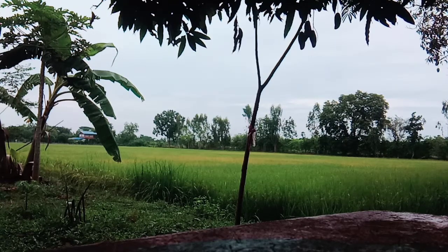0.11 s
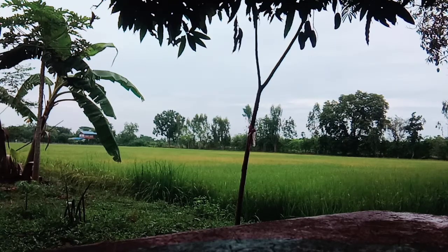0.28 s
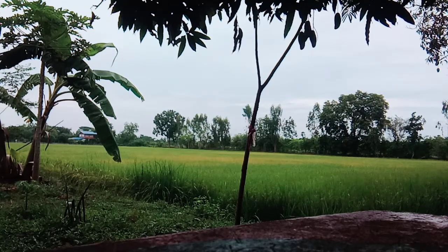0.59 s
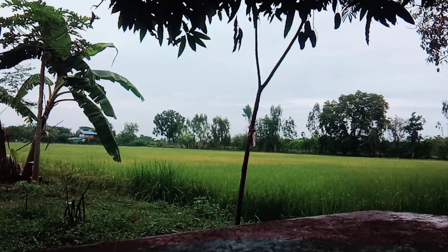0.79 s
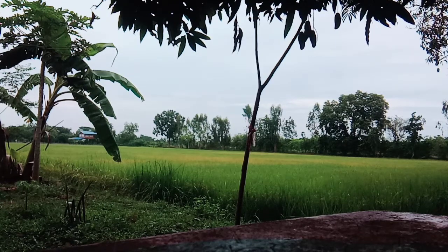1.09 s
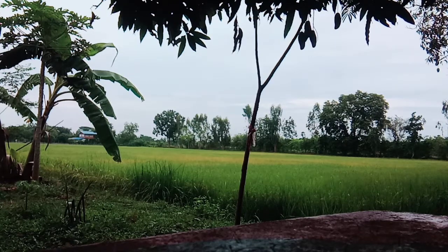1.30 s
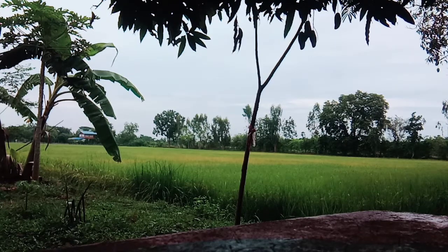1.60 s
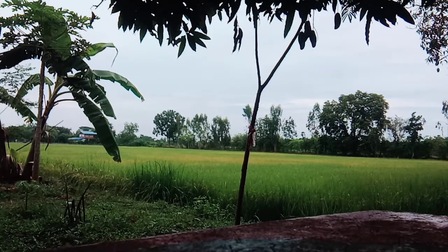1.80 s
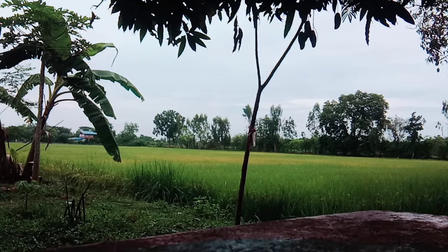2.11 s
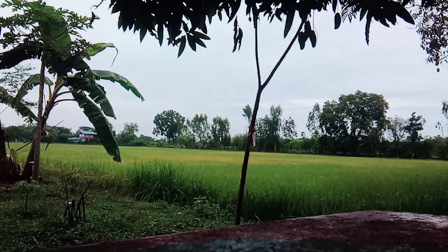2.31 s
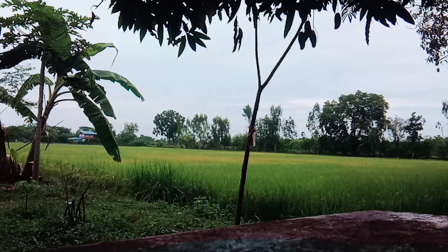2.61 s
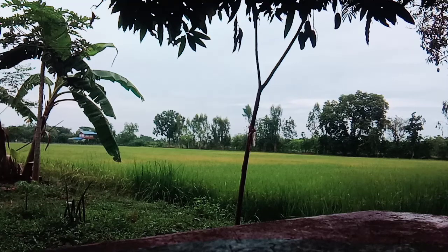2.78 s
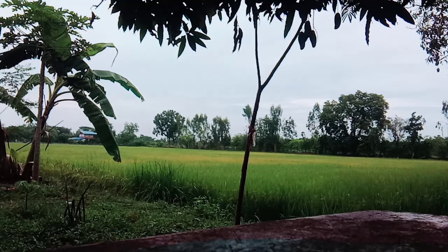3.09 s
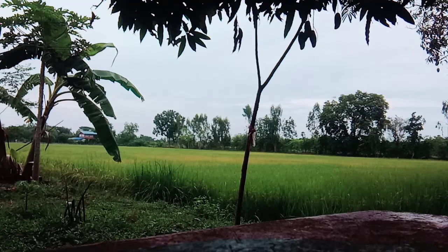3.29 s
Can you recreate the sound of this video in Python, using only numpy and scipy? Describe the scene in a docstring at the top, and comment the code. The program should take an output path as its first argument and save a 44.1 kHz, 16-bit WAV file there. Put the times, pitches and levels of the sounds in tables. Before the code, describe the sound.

A bird's sharp buzzy chirp repeats over a rice field while a distant rooster crows once midway

```python
"""Morning at the edge of a rice field: hazy air, noise-band insects and a humming far motor run throughout.
From the start a far bird pipes arched tones and songbirds whistle thin glides; a near bird soon joins,
repeating a buzzy chirp, a wavering tone plus noise, in three steps of lower and lower pitch. Then fowl cluck
in short rising tones, and two soft knocks ring in low modes, one before and one during a rooster's single
crow of stacked harmonics. Very distant calls overlap behind it all, and foliage scatters every call."""
import sys
import numpy as np
from scipy import signal
from scipy.fft import rfft, irfft
from scipy.io import wavfile

SR = 44100
rng = np.random.default_rng(int(sys.argv[2]) if len(sys.argv) > 2 else 0)


def generate_wav(sig):
    """Save sig (samples, or channels by samples) to the path in sys.argv[1] as 16-bit PCM at SR."""
    pcm = np.round(np.clip(np.atleast_2d(sig).T, -1, 1) * 32767).astype(np.int16)
    wavfile.write(sys.argv[1], SR, pcm)


N = 152145  # samples, about 3.45 s


def undb(db):
    """Turn decibels into gain."""
    return 10 ** (np.asarray(db) / 20)


def unit(x):
    """Scale a sound to rms 1."""
    return x / np.sqrt(np.mean(x ** 2) + 1e-20)


def band(hz, width):
    """Noise in one bell-shaped band of frequencies, rms 1."""
    f = np.arange(N // 2 + 1) * SR / N
    bell = np.exp(-2 * ((f - hz) / width) ** 2)
    return unit(irfft(rfft(rng.standard_normal(N)) * bell, N))


def wobble(rate):
    """Smooth random wander with spread 1; a higher rate in Hz wanders faster."""
    return band(0, 2 * rate)


def tone(hz):
    """Sine of rms 1 that follows a pitch curve."""
    return np.sqrt(2) * np.sin(2 * np.pi * np.cumsum(hz) / SR)


def note(start, length):
    """Progress 0-1 through a note, and its rounded envelope."""
    u = np.clip((np.arange(N) / SR - start) / length, 0, 1)
    arch = np.abs(np.sin(np.pi * u))
    return u, np.sqrt(arch) * np.minimum(4 * arch, 1)


def course(points):
    """Join (time_s, value) points by straight lines."""
    return np.interp(np.arange(N) / SR, *np.array(points).T)


def rasp(start, length, from_hz, to_hz, width_hz):
    """A rough note: a band of noise moved up to a gliding pitch."""
    u, gate = note(start, length)
    return gate * tone(from_hz + (to_hz - from_hz) * u) * band(0, width_hz)


def scatter(x, early_db, early_t60, late_db, late_t60):
    """Direct sound, quick echoes from leaves and trunks, and a faint tail from the tree line."""
    t = np.arange(N) / SR
    echoes = rng.standard_normal(N) * (rng.random(N) < .05)  # sparse random echoes
    response = np.zeros(N)
    for db, t60 in ((early_db, early_t60), (late_db, late_t60)):
        fade = np.exp(-np.log(1000) * t / t60)  # falls 60 dB in t60 seconds
        tail = echoes * fade * np.minimum(t * 20 / t60, 1)
        response += undb(db) * tail / np.linalg.norm(tail)
        echoes = echoes[::-1]
    response[0] = 1  # direct sound
    return signal.fftconvolve(x, response / np.linalg.norm(response))[:N]


# near bird, three steps to a chirp: start_s, length_s, base_pitch_hz, base_level_db,
# buzz (0-1), opening_level_db (added to the start of the step)
CHIRP_STEPS = [(.314, 0.036, 4960, -35.5, 0.78, -2), (.353, 0.0294, 4554, -25.5, 0.5, -16),
               (.388, 0.033, 3480, -36, 1, -6.5), (1.369, 0.028, 4750, -36.5, 0.76, -2.5),
               (1.402, 0.031, 4463, -29, 0.7, -7), (1.43, 0.042, 3463, -35, 0.94, -4),
               (2.095, .034, 5096, -32, 0.96, -5.5), (2.131, 0.039, 4637, -33.5, 0.77, 1.5),
               (2.168, 0.045, 3565, -37.5, 0.78, -6.5), (3.014, 0.0334, 4955, -34, 0.72, -4),
               (3.046, 0.03, 4320, -30, 0.85, -5), (3.082, 0.038, 3603, -33.5, 0.64, -8)]
# pitch and loudness along every step: share of its length (0-1), pitch_ratio, added_level_db
STEP_COURSE = [(0, .96, -1), (.2, .91, -5), (.36, 0.94, -4), (.7, 1.01, -3), (1, .96, -4.5)]
# thin, broken slur leading into each chirp: start_s, length_s, from_hz, to_hz, level_db
LEAD_SLURS = [(0.293, 0.027, 7370, 6320, -58), (0.31, 0.016, 6000, 5520, -50),
              (1.327, 0.044, 7500, 7350, -64.5), (1.355, 0.023, 5480, 5350, -52.5),
              (2.067, 0.025, 7300, 6400, -60.5), (2.082, 0.015, 5700, 5316, -50),
              (2.992, 0.028, 5650, 5370, -53.5)]
BUZZ_HZ, BUZZ_DEPTH, CHIRP_JITTER = 245.1, 0.041, 0.035  # depth and jitter are shares of the pitch
CHIRP_OVERTONE_DB = -48.5
RASP_WIDTH_HZ, RASP_DB = 1120, -6  # noise that spreads each step; level against the whistle at full buzz
OPENING_SHARE, OPENING_FADE_SHARE = 0.24, 0.42  # shares of the step; the fade is longer with more buzz
LEAD_WIDTH_HZ, NOTE_TOP_HZ = 800, 5350


def near_bird():
    """A thin slur, then three buzzy notes stepping down in pitch, each dipping and then rising.

    Fast pitch wavering and rasp make the buzz; a low-pass filter softens the notes."""
    share, ratio, shape_db = np.array(STEP_COURSE).T
    notes, thin = np.zeros(N), np.zeros(N)
    buzz = BUZZ_DEPTH * tone(BUZZ_HZ * (1 + 0.1958 * wobble(42.1)))
    buzz += CHIRP_JITTER * band(600, 437)
    for start, length, pitch, db, depth, opening_db in CHIRP_STEPS:
        u, gate = note(start, length)
        hz = pitch * np.interp(u, share, ratio) * (1 + depth * buzz)
        opening_left = np.clip(1 - (u - OPENING_SHARE) / (OPENING_FADE_SHARE * depth + .01), 0, 1)
        level_db = db + opening_db * opening_left + np.interp(u, share, shape_db)
        level_db = level_db + 1.56 * depth * wobble(170)  # rough loudness
        swell = np.minimum(2 * gate, 1) * undb(level_db)
        roughness = 1 + depth * undb(RASP_DB) * band(0, RASP_WIDTH_HZ)
        notes += swell * tone(hz) * roughness
        thin += swell * undb(CHIRP_OVERTONE_DB) * (tone(2 * hz) + tone(3 * hz))
    for start, length, from_hz, to_hz, db in LEAD_SLURS:
        thin += undb(db) * rasp(start, length, from_hz, to_hz, LEAD_WIDTH_HZ)
    low_pass = signal.butter(10, NOTE_TOP_HZ, fs=SR, output="sos")
    notes = signal.sosfilt(low_pass, notes)
    return scatter(notes + thin, early_db=-2.5, early_t60=0.21, late_db=-9.5, late_t60=0.42)


# pitch and loudness points along the crow: time_s, base_pitch_hz, level_db
CROW_COURSE = [(1.51, 539.7, -53), (1.545, 574.8, -52), (1.575, 602, -43.5), (1.657, 600.6, -39),
               (1.699, 574.4, -47), (1.748, 563, -44.5), (1.77, 560, -55), (1.795, 561.7, -61),
               (1.841, 556.5, -40.5), (1.86, 556.4, -60), (1.885, 569.7, -44.5), (1.916, 579.5, -38.5),
               (1.95, 558.3, -49), (1.986, 530.5, -40.5), (2.034, 477, -57.5)]
# strength of harmonics 1, 2, 3...: level_db
HARMONIC_LEVELS = [-36, -1.5, -35, -32, -25]
# hoarse catches in the crow: start_s, length_s, level_db
HOARSE_CATCHES = [(1.535, 0.036, -42), (1.774, 0.04, -44.5), (1.869, 0.029, -45), (1.98, 0.032, -48)]
HOARSE_HZ, HOARSE_NOISE_DB, CROW_FADE_S = 953, -3, 0.0044


def rooster():
    """A far crow carried by its second harmonic, with hoarse catches of shaky tone and noise."""
    t = np.arange(N) / SR
    times, pitch, level_db = np.array(CROW_COURSE).T
    hz = np.interp(t, times, pitch) * (1 + 0.0085 * wobble(91))
    clear = sum(undb(db) * tone((k + 1) * hz) for k, db in enumerate(HARMONIC_LEVELS))
    fade = np.clip(np.minimum(t - times[0], times[-1] - t) / CROW_FADE_S, 0, 1)
    voice = fade * undb(np.interp(t, times, level_db)) * clear
    for start, length, db in HOARSE_CATCHES:
        u, gate = note(start, length)
        shaky = tone(HOARSE_HZ * (1 + 0.0243 * wobble(74)))
        noise = undb(HOARSE_NOISE_DB) * band(1070, 240)
        voice += undb(db) * gate * (shaky + noise)
    return scatter(voice, early_db=-7.5, early_t60=0.26, late_db=-15.5, late_t60=0.88)


# soft hollow knocks: start_s, pitch_hz, base_level_db, upper_modes_db (added), rise_s, scuff_db
KNOCK_EVENTS = [(.903, 294.5, -36.5, -12, 0.031, -53), (1.655, 345.4, -35, 0.5, .028, -66)]
# ways the knocked object rings: pitch_ratio, base_level_db, t60_s (time to fall 60 dB)
RING_MODES = [(.7, -17.5, 0.35), (1, 2.5, 0.24), (1.218, -1, 0.14), (1.48, -13, 0.25)]
SCUFF_DELAY_S, SCUFF_S, KNOCK_ROUGH = 0.041, 0.1, 0.34


def knocks():
    """A soft contact swells into low, fading modes and trails off in a noisy scuff."""
    out = np.zeros(N)
    for start, hz, db, upper_db, rise, scuff_db in KNOCK_EVENTS:
        age = np.maximum(np.arange(N) / SR - start, 0)
        ring = np.zeros(N)
        for ratio, mode_db, t60 in RING_MODES:
            fade = np.exp(-np.log(1000) * age / t60)
            mode_gain = undb(mode_db + upper_db * (ratio > 1))
            ring += mode_gain * np.sin(2 * np.pi * hz * ratio * age) * fade
        soft_start = np.sin(np.pi / 2 * np.minimum(age / rise, 1)) ** 2
        out += undb(db) * ring * (1 + KNOCK_ROUGH * wobble(60)) * soft_start
        u, gate = note(start + SCUFF_DELAY_S, SCUFF_S)
        out += undb(scuff_db) * gate * (band(337, 81) + undb(-2) * band(580, 330))
    return scatter(out, early_db=-12, early_t60=.16, late_db=-26, late_t60=.6)


# piping bird: start_s, length_s, top_pitch_hz (before the waver), level_db
PIPE_NOTES = [(-.02, 0.063, 1097, -54), (.078, 0.046, 1100, -51), (0.181, 0.077, 1204, -50.5),
              (0.329, 0.098, 1242, -52.5), (.505, 0.11, 1216, -53), (.695, 0.12, 1217, -54),
              (.893, 0.12, 1237, -54), (1.097, .13, 1193, -52.5), (1.18, 0.074, 1137, -53),
              (1.309, 0.14, 1239, -56), (3.211, .08, 1230, -62.5)]
PIPE_ARCH, PIPE_WAVER = .165, 0.0053  # shares of the pitch
PIPE_ECHO_S, PIPE_ECHO_DB = 0.082, -11


def piping_bird():
    """Each note rises and falls in a slightly shaky arch, and the tree line throws it back."""
    out, waver = np.zeros(N), 1 + PIPE_WAVER * wobble(66.7)
    for start, length, hz, db in PIPE_NOTES:
        for late, echo_db in ((0, 0), (PIPE_ECHO_S, PIPE_ECHO_DB)):
            u, gate = note(start + late, length)
            arch = 1 - PIPE_ARCH * (2 * u - 1) ** 2
            out += undb(db + echo_db) * gate * tone(hz * waver * arch)
    return scatter(out, early_db=-13, early_t60=.3, late_db=-7, late_t60=1.4)


# fowl: start_s, length_s, middle_pitch_hz (before the waver), level_db
CLUCK_NOTES = [(0.842, 0.042, 700, -60.5), (1.02, 0.038, 690, -54.5), (1.198, 0.15, 763, -60),
               (1.487, 0.042, 678, -57), (1.548, 0.02, 717, -54.5), (1.762, 0.037, 657, -52.5),
               (2.008, 0.084, 696, -55.5), (2.146, 0.11, 787, -55.5), (2.304, 0.029, 650, -57.5),
               (2.566, 0.099, 700, -55), (2.828, 0.035, 692, -45), (3.092, 0.054, 715, -50.5),
               (3.393, 0.017, 676, -54), (3.418, 0.029, 700, -54.5)]


def fowl():
    """Short hollow clucks: shaky single tones that rise a little."""
    out, waver = np.zeros(N), 1 + 0.0337 * wobble(77.5)
    for start, length, hz, db in CLUCK_NOTES:
        u, gate = note(start, length)
        rise = 1 + 0.083 * (u - .5)
        out += undb(db) * gate * tone(hz * waver * rise)
    return scatter(out, early_db=-9.5, early_t60=0.41, late_db=-9, late_t60=0.52)


# far songbirds: start_s, length_s, from_hz, to_hz (both before the waver), base_level_db
WHISTLE_NOTES = [(0, 0.041, 2930, 2880, -62), (0.202, 0.052, 3530, 3385, -57),
                 (0.747, 0.061, 3820, 3870, -56), (0.899, 0.046, 2486, 2764, -50.5),
                 (0.945, 0.061, 2747, 2790, -57), (1.114, 0.046, 2170, 2330, -53.5),
                 (1.193, 0.083, 2420, 2824, -52.5), (1.386, 0.039, 2360, 2330, -47.5),
                 (1.457, .09, 2450, 2760, -49.5), (1.697, .045, 2300, 2335, -52.5),
                 (1.751, 0.057, 2424, 2654, -48.5), (1.808, 0.052, 2656, 2540, -52),
                 (1.879, 0.085, 2980, 3340, -58), (1.973, 0.034, 2496, 2543, -50.5),
                 (2.894, 0.035, 3650, 3880, -53), (3.342, 0.068, 2530, 2515, -57)]
# dry rasps of other birds: start_s, length_s, from_hz, to_hz, width_hz, level_db
RASP_NOTES = [(.79, 0.051, 2907, 2910, 1510, -49.5), (.969, 0.046, 2720, 2687, 1500, -50),
              (1.019, 0.01, 2030, 1950, 900, -43.5), (1.165, .04, 2185, 2340, 805, -53),
              (1.675, 0.031, 2400, 2590, 1000, -50), (1.956, .034, 4410, 3360, 600, -44),
              (1.948, 0.0495, 3133, 3380, 704, -44.5), (2.597, 0.085, 3290, 3324, 1310, -55.5),
              (2.836, 0.085, 3220, 3243, 1220, -50.5)]


def songbirds():
    """Thin whistles that glide and level off, and dry rasps of gliding noise from the trees."""
    whistles, waver = np.zeros(N), 1 + .014 * wobble(140)
    for start, length, from_hz, to_hz, db in WHISTLE_NOTES:
        u, gate = note(start, length)
        hz = from_hz + (to_hz - from_hz) * np.sin(np.pi * u / 2)
        whistles += undb(db) * gate * tone(hz * waver)
    rasps = np.zeros(N)
    for start, length, from_hz, to_hz, width, db in RASP_NOTES:
        rasps += undb(db) * rasp(start, length, from_hz, to_hz, width)
    whistles = scatter(whistles, early_db=-0.5, early_t60=0.27, late_db=-3, late_t60=1.2)
    rasps = scatter(rasps, early_db=0.5, early_t60=0.24, late_db=-6.5, late_t60=1.0)
    return undb(-0.5) * whistles + rasps


# very distant birds: centre_hz, spread_octaves, calls_per_s, base_level_db
CHORUS_GROUPS = [(971.4, .16, 11, -64.5), (2908, .22, 16, -63), (1647, 0.18, 9, -71.5)]
# level of this chorus and of the middle of the air, around 700-1400 Hz: time_s, added_level_db
MIDDLE_COURSE = [(0, -0.5), (.8, -1), (1.3, 2.5), (2.2, 1.5), (2.9, 2.5), (3.1, -3), (3.45, -7)]
CHORUS_NOTE_S, CHORUS_GLIDE = .11, .08  # the glide is a share of the pitch


def chorus():
    """Faint overlapping calls from across the field, each a tone with its own random pitch and glide."""
    out = np.zeros(N)
    for hz, spread, rate, db in CHORUS_GROUPS:
        draws = rng.standard_normal((60, 4))
        calls, waver = np.zeros(N), 1 + .022 * wobble(70)
        count = int(rate * N / SR) + 1
        for k, (late, pitch, glide, size) in enumerate(draws[:count]):
            u, gate = note((k + late / 2) / rate, CHORUS_NOTE_S)
            call_hz = hz * waver * 2 ** (spread * pitch) * (1 + CHORUS_GLIDE * glide * (u - .5))
            calls += undb(2 * size) * gate * tone(call_hz)
        out += undb(db) * unit(calls)
    far = scatter(out, early_db=-5.5, early_t60=0.16, late_db=-3.0, late_t60=0.77)
    return undb(course(MIDDLE_COURSE)) * far


# tone colour of the still air: frequency_hz, relative_level_db (per Hz)
AIR_COLOUR = [(20, -13), (40, -17.5), (65, 2), (120, 4.5), (220, 0), (320, -14.5), (530, -27.5),
              (720, -16.5), (900, -17), (1200, -11.5), (1420, -22), (2000, -21.5), (2700, -14.5),
              (3800, -18), (4900, -17.5), (5600, -40.5), (7200, -31), (8000, -48), (10800, -47.5),
              (12000, -49), (15500, -49.5)]
# level of the air over time: time_s, added_level_db
AIR_COURSE = [(0, -4), (.4, 0), (1, -1.5), (2.6, 0), (3.45, 1)]
# insects: centre_hz, width_hz, base_level_db, base_flutter_hz
INSECT_BANDS = [(4712, 410, -62.5, 59), (6780, 390, -73.5, 110), (7118, 265, -74, 43),
                (8540, 1100, -90.5, 66), (10600, 1100, -93.5, 96)]
# hum of the far motor: base_pitch_hz, base_level_db
MOTOR_TONES = [(116, -59.5), (236, -68.5)]
AIR_DB, AIR_FLICKER_DB, INSECT_FLUTTER = -51.5, 2.16, 0.14


def field():
    """Gently flickering noise for the air, fluttering noise bands for insects and a hum for a far motor."""
    f = np.maximum(np.arange(N // 2 + 1) * SR / N, 1)
    hz, db = np.array(AIR_COLOUR).T
    colour = undb(np.interp(np.log(f), np.log(hz), db))
    spectrum = rfft(rng.standard_normal(N)) * colour
    half_octave = np.clip(2 * np.log2(f), 10, 28)
    middle, air = course(MIDDLE_COURSE), np.zeros(N)
    for k in range(10, 29):  # overlapping half-octave bands, each with its own flicker
        in_middle = 19 <= k <= 21
        part = irfft(spectrum * np.maximum(1 - np.abs(half_octave - k), 0), N)
        air += part * undb(AIR_FLICKER_DB * wobble(7.2) + in_middle * middle)
    insects = np.zeros(N)
    for hz, width, db, flutter in INSECT_BANDS:
        buzz = undb(db) * band(hz, width) * undb(1.8 * wobble(40))
        beat = tone(flutter * (1 + 0.1522 * wobble(7.95)))
        insects += buzz * (1 + INSECT_FLUTTER * beat)
    motor = np.zeros(N)
    for hz, db in MOTOR_TONES:
        motor += undb(db + 4.1 * wobble(2.8)) * tone(hz * (1 + 0.0248 * wobble(7.94)))
    return undb(AIR_DB + course(AIR_COURSE)) * unit(air) + insects + motor


def scene():
    """Add up everything heard from one spot under the trees, in one channel."""
    birds = near_bird() + rooster() + piping_bird() + fowl() + songbirds() + chorus()
    return (birds + knocks() + field())[None]


def record(dry):
    """A steep low-pass filter cuts the top of the sound, above 15500 Hz."""
    return signal.sosfilt(signal.ellip(8, .2, 70, 15500, fs=SR, output="sos"), dry)


dry = scene()
out = record(dry)
generate_wav(out)
```